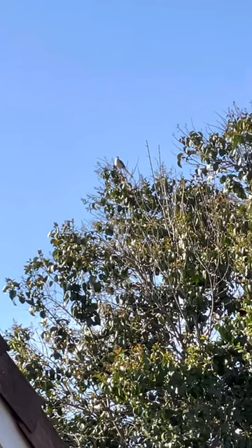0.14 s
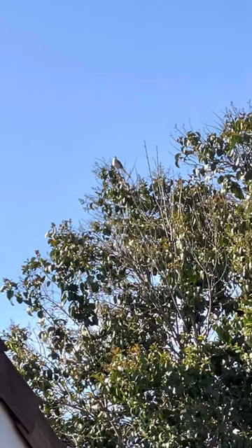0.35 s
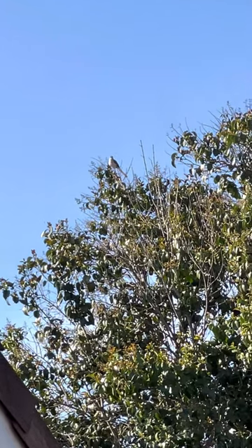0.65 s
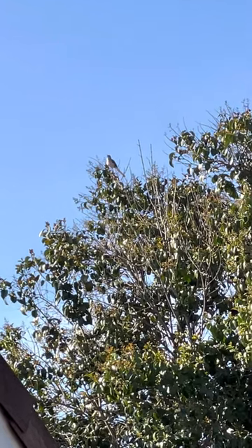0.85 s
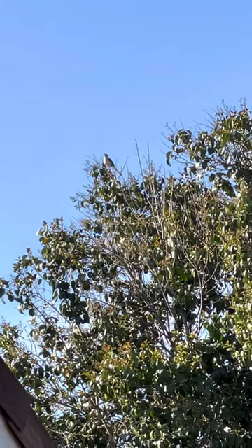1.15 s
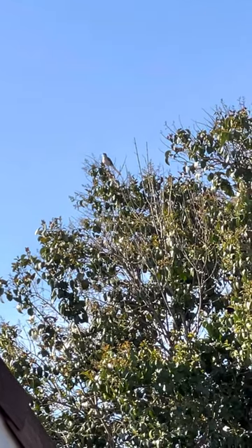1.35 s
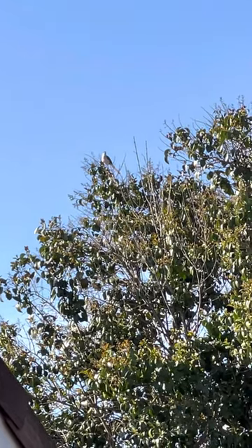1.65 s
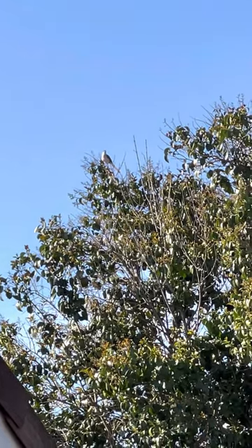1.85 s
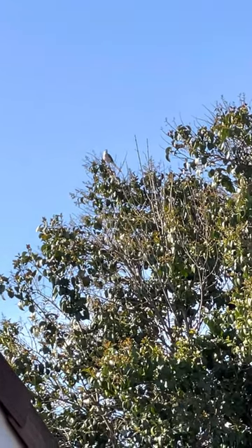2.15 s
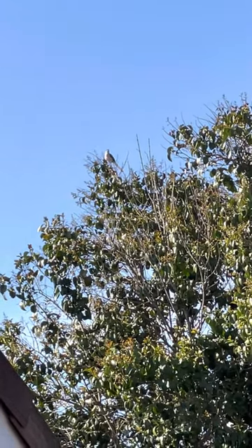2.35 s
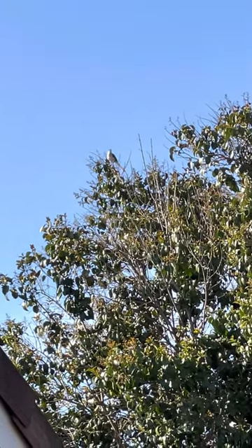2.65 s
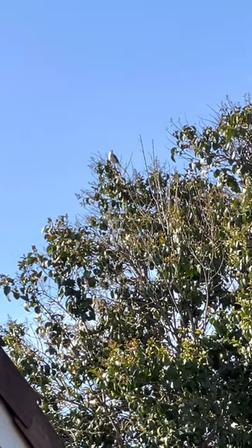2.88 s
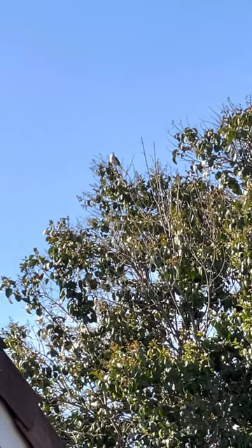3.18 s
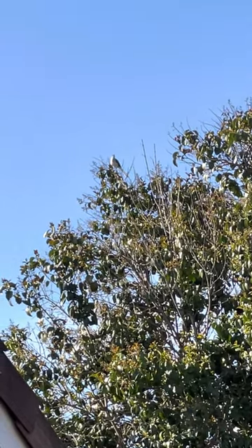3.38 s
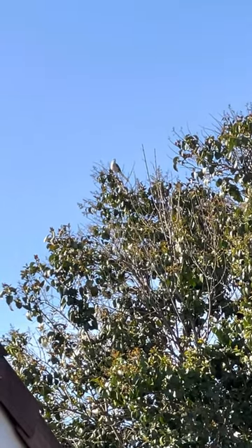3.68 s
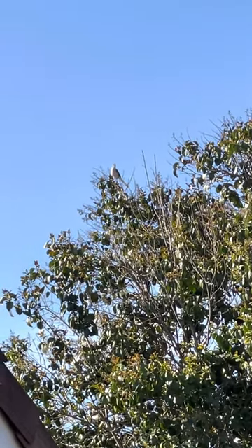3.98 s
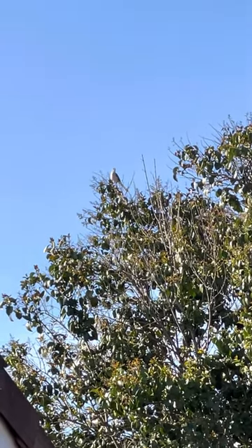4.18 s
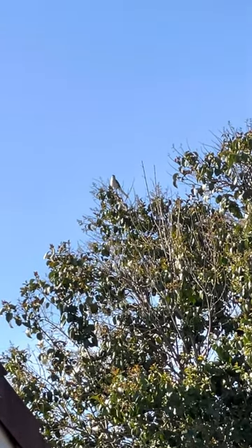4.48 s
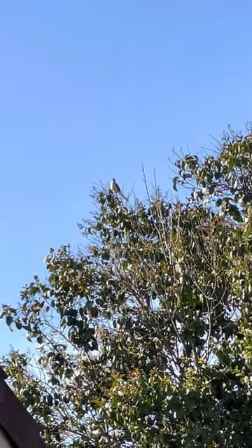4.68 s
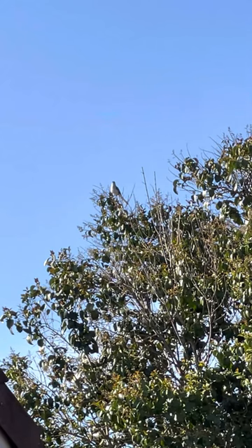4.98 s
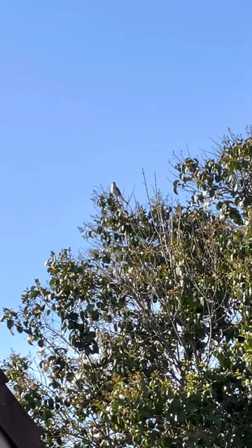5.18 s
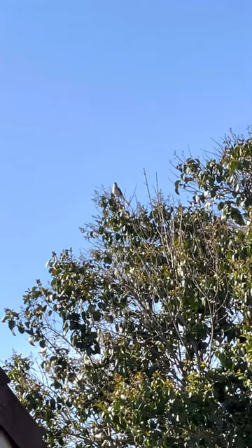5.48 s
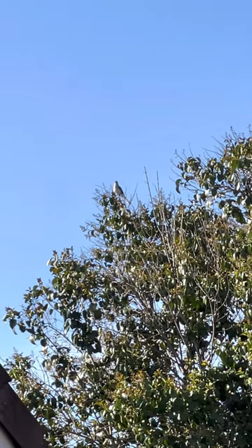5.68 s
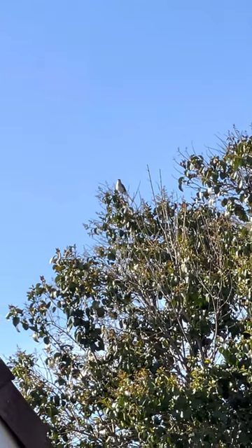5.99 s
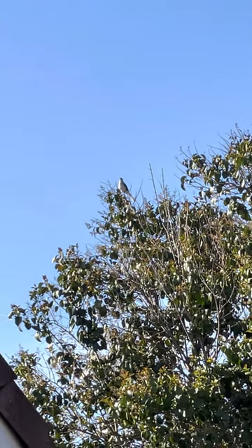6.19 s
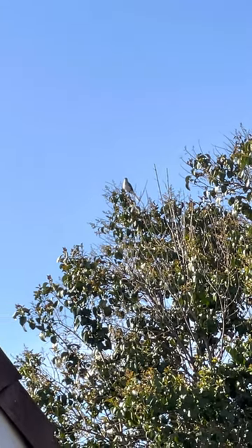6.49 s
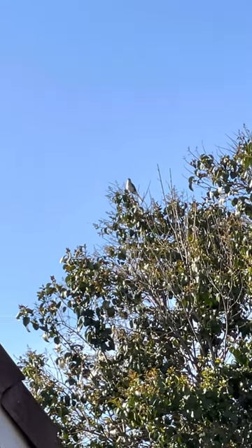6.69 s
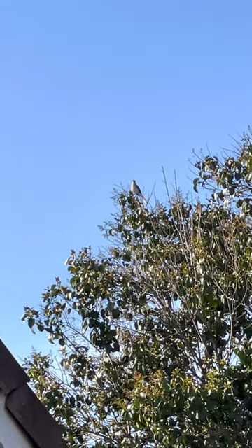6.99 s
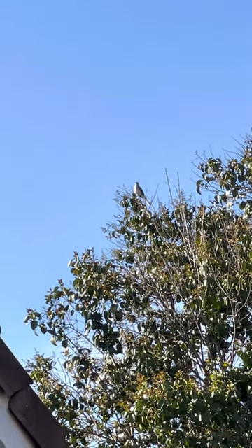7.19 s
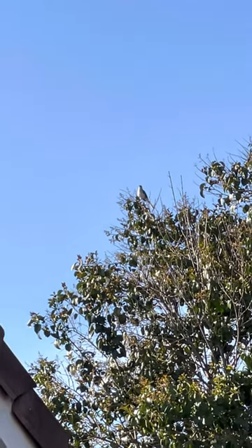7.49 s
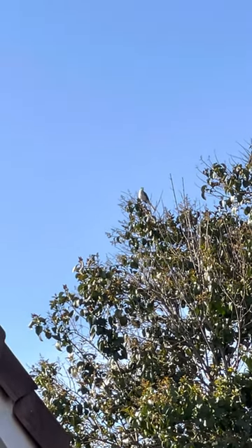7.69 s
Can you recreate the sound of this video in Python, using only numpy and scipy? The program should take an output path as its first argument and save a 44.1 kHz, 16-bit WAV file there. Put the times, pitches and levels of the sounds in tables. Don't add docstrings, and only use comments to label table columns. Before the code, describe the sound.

Outdoors, a bird whines once, mews five times like a cat, then rasps two sharp chips; faint wren trills, dove coos and town rumble behind.

```python
import sys
import numpy as np
from scipy import signal
from scipy.fft import rfft, irfft, next_fast_len
from scipy.io import wavfile
from scipy.ndimage import uniform_filter1d, map_coordinates

SR = 44100
rng = np.random.default_rng(int(sys.argv[2]) if len(sys.argv) > 2 else 0)


def int16_out(signal):
    q = np.round(np.clip(np.atleast_2d(signal).T, -1, 1) * 32767)
    wavfile.write(sys.argv[1], SR, q.astype(np.int16))


def attenuation_scalar(level_db):
    decades = np.asarray(level_db, float) / 20
    return 10 ** decades


N = 345744
T = np.arange(N) / SR
TOP_HZ = 15690


def unit(x):
    return x / np.sqrt(np.mean(x ** 2) + 1e-20)


def along(points, hz):
    f, v = np.transpose(points)
    return np.interp(np.log(hz + 1), np.log(f + 1), v)


def wobble(rate, size=N):
    knots = rng.standard_normal(int(size * rate / SR) + 4)
    return map_coordinates(knots, [np.arange(size) * rate / SR])


def wobbles(rate, size, count, group):
    curves = np.array([wobble(rate, size=size) for _ in range(0, count, group)])
    return curves.repeat(group, 0)[:count]


def filtered(x, response):
    m = next_fast_len(x.shape[-1] + 8192)
    return irfft(rfft(x, m) * response(np.fft.rfftfreq(m, 1 / SR)), m)[..., :x.shape[-1]]


def span(rows):
    s, *cols = np.transpose(rows)
    t = np.arange(s[0], s[-1], 1 / SR)
    edge = np.clip(np.minimum(t - s[0], s[-1] - t) / 0.004, 0, 1)
    return round(s[0] * SR), edge, [np.interp(t, s, c) for c in cols]


def add(track, start, x):
    track[start:start + len(x)] += x[:len(track) - start]


def voice(calls, throat, count, sharp, steep, leak_db, jitter, rasp, shimmer_db,
          flutter_hz, flutter_db, breath_db, closing_db):
    patchy_db, leak_hz = 4, 3000
    gape_hz = 170
    out, k = np.zeros(N), np.arange(2, count + 1)[:, None]
    for rows in calls:
        start, edge, (hz, beak_hz, db) = span(rows)
        n = len(hz)
        hz = uniform_filter1d(hz, size=1100, mode="nearest")
        glide = uniform_filter1d(np.abs(np.gradient(hz)) * SR, size=900) / 1000
        unsteady_hz = hz * (1 + (jitter + rasp * glide) * wobble(250, size=n))
        phase = 2 * np.pi * np.cumsum(unsteady_hz) / SR
        fall = np.maximum.accumulate(hz) - hz
        beat_hz = (flutter_hz + .7 * fall) * (1 + 0.12 * wobble(30, size=n))
        beat = 2 * np.pi * np.cumsum(beat_hz) / SR
        upper = attenuation_scalar(flutter_db) * np.clip(fall / 25 - 1, 0, 1)

        partial_hz = k * hz
        over = partial_hz / beak_hz
        gape = 1 + (hz.max() - hz - fall) / gape_hz
        ring = np.abs(sharp / gape * (1 - over ** 2) + 1j * over) ** -steep
        leak = attenuation_scalar(leak_db + patchy_db * wobbles(14, n, len(k), 3)) / (1 + (partial_hz / leak_hz) ** 3)

        ceiling_hz = 10300 + 1.95 * beak_hz
        dull_db = closing_db * np.clip(k - 5, 0, None) * fall / 50
        dull_db = dull_db + 14 * np.clip(partial_hz - ceiling_hz, 0, None) / 1000
        gain = attenuation_scalar(along(throat, partial_hz) - dull_db) * (ring + leak) * (partial_hz < TOP_HZ)
        gain = gain * np.sqrt(2 / (1 + upper ** 2)) * attenuation_scalar(shimmer_db * wobbles(70, n, len(k), 2))

        spread = k ** 1.7 * (1 + glide + (k - 2) * fall / 25)
        air = attenuation_scalar(breath_db) * spread * wobbles(400, n, len(k), 1)
        angle = k * phase
        lines = np.sin(angle + k * k) + upper * (np.sin(angle + beat) + 0.24 * np.sin(angle - beat))
        stack = (lines + air * np.cos(angle)) / np.sqrt(1 + attenuation_scalar(2 * breath_db) * spread ** 2)
        add(out, start, edge * attenuation_scalar(db) * np.sum(gain * stack, 0))
    return out


def whine(rows, sharp):
    # frequency in hertz, gain in dB.
    whine_throat = [(1500, -23), (2600, -6.5), (3500, -6.5), (5100, -3), (6100, -1), (7000, -10.5),
                    (8700, 12), (9600, -31), (11000, 10.5), (13500, 3), (15500, 2)]
    return voice([rows], whine_throat, count=20, sharp=sharp, steep=1.256, leak_db=-37, jitter=0.0054,
                 rasp=.007, shimmer_db=2.0, flutter_hz=0, flutter_db=-58, breath_db=-36.5, closing_db=9)


def near_whine():
    # time in seconds, pitch in hertz, beak resonance in hertz, level in dB.
    whine_path = [(.69, 689, 5200, -88), (.712, 717, 5260, -52), (.738, 799, 5900, -47),
                  (.785, 838, 5440, -46), (.865, 844.5, 5120, -44.5), (.93, 866, 4100, -43.5),
                  (1.1, 876, 4100, -48), (1.2, 894.4, 4000, -54), (1.24, 928, 3850, -76)]
    return whine(whine_path, sharp=4.38)


def melody(mew, db):
    # stage (0-1 climb, 1-2 arch, 2-3 fall), pitch as a share of top pitch,
    # beak resonance in hertz, level in dB.
    mew_shape = [(0, .75, 2460, -77.5), (.25, .79, 2470, -60.5), (.6, .878, 2860, -49),
                 (0.999, .963, 2720, -44.5), (1.5, 1.002, 2340, -43), (1.951, .978, 1850, -47),
                 (2.24, .968, 1480, -48), (2.62, .875, 1485, -52), (3, .83, 1364, -70.5)]
    s, *stages_s, top_hz = mew
    stage, share, beak_hz, level_db = np.transpose(mew_shape)
    times = np.interp(stage, np.arange(len(stages_s) + 1), np.cumsum([s] + stages_s))
    return np.transpose([times, top_hz * share, beak_hz, db + level_db])


def mews():
    # start in seconds, climb in seconds, arch until the beak shuts in seconds,
    # fall in seconds, top pitch in hertz.
    mew_calls = [
        (1.37, .098, .127, .255, 783),
        (2.06, .118, .102, .18, 776),
        (3.55, .094, .136, .24, 797),
        (4.37, .1, .107, .263, 785),
        (5.05, .128, .084, .198, 782),
    ]
    mew_strengths = [-0.2, 0.55, -0.91, 0.61, -0.24]
    # frequency in hertz, gain in dB.
    mew_throat = [(1500, -0.5), (2300, 1.5), (3000, -1.5), (3800, 5), (4500, -8.5), (5300, 2), (8700, 4),
                  (9700, -41.5), (11000, 20), (12400, 14.5), (14300, 29), (15500, 21.5)]
    return voice(map(melody, mew_calls, mew_strengths), mew_throat, count=22, sharp=4.75, steep=1.71,
                 leak_db=-26, jitter=0.0033, rasp=.0008, shimmer_db=1.5, flutter_hz=44.85, flutter_db=-2.0,
                 breath_db=-34, closing_db=.85)


def chips():
    # start in seconds, length in seconds, level in dB, beak closing at the middle (no unit).
    chip_calls = [
        (.694, 0.032, -56, -1.5),
        (6.594, 0.074, -44, 0.68),
        (7.603, 0.067, -42.5, 0.63),
    ]
    # frequency in hertz, noise density in dB per hertz.
    beak_open = [(710, -63), (1200, -36), (2030, -33), (2330, -8), (2770, -2), (3180, -16.5), (3660, -0.5),
                 (4160, -20.5), (5150, -12.5), (5680, -19), (7580, -22), (9700, -19.5), (10000, -33),
                 (11100, -21.5), (15500, -47)]
    beak_shut = [(710, -70), (1200, -27), (1640, -21.5), (2260, 3.5), (2890, -3.5), (4120, -32),
                 (4780, -30.5), (5680, -43.5), (8080, -35), (10100, -60), (15500, -37)]
    attack_s, release_s, edge_db = 0.012, 0.024, -22
    out = np.zeros(N)
    for s, length, top_db, shut in chip_calls:
        turns = s + np.array([0, attack_s, length - release_s, length])
        levels = top_db + edge_db * np.array([1, 0, 0, 1])
        start, edge, (db,) = span(np.transpose([turns, levels]))
        n = len(db)
        flap_hz = 230 * (1 + 0.304 * wobble(100, size=n))
        flaps = 1 + 0.16 * np.sin(2 * np.pi * np.cumsum(flap_hz) / SR)
        opened, closed = (unit(filtered(flaps * rng.standard_normal(n), lambda hz: attenuation_scalar(along(beak, hz))))
                          for beak in (beak_open, beak_shut))
        ramp = np.clip(np.linspace(-1, 1, n) * 2.1 + shut, 0, 1)
        add(out, start, edge * attenuation_scalar(db) * (np.sqrt(1 - ramp) * opened + np.sqrt(ramp) * closed))
    return out


def whistles(notes, buzz=0, buzz_hz=230, unsteady=0.0049):
    out = np.zeros(N)
    for s, length, a, b, c, db in notes:
        u = np.linspace(-1, 1, round(length * SR))
        bend_hz = b + (c - a) / 2 * u + ((a + c) / 2 - b) * u * u
        hz = bend_hz * (1 + unsteady * wobble(60, size=len(u)))
        swell = np.sqrt(1 - u ** 4) * (1 + buzz * np.sin(np.pi * buzz_hz * length * u))
        level = attenuation_scalar(db + 5 + wobble(22, size=len(u)))
        add(out, round(s * SR), level * swell * np.sin(2 * np.pi * np.cumsum(hz) / SR))
    return out


def arched(notes, arch):
    return [(s, length, a, (a + b) / 2 * (1 + arch), b, db) for s, length, a, b, db in notes]


def chip_peep():
    # start in seconds, length in seconds, start and end pitch in hertz, level in dB.
    thin_tone = [(7.59, 0.059, 4960, 5380, -65.5)]
    return whistles(arched(thin_tone, 0))


def earlier_whine():
    # time in seconds, pitch in hertz, beak resonance in hertz, level in dB.
    whine_end = [(0, 920, 5070, -59.5), (.025, 868, 5040, -76)]
    return whine(whine_end, sharp=1.75)


def wren():
    # start in seconds, trill beats, trill level in dB, buzz start in seconds, buzz level in dB.
    wren_songs = [
        (1.704, 9, -69.5, 2.56, -65.5),
        (5.63, 9, -70.5, 6.5, -64.5),
    ]
    slurs, buzzes = [], []
    for s, beats, db, buzz_s, buzz_db in wren_songs:
        slurs.append((s, .09, 5600, 5650, 5600, db - 11.5))
        for beat in s + .093 + .0877 * np.arange(round(beats)):
            slurs.append((beat, .024, 3750, 3250, 2650, db - 2.0 + 5 * (beat - s)))
            slurs.append((beat - .045, .035, 3500, 3750, 3300, db - 9))
            if beat < s + .75:
                slurs.append((beat + .052, .026, 6100, 5800, 5500, db - 2.0))
                slurs.append((beat + .005, .045, 5550, 5750, 6000, db - 9.0))
        buzzes.append((buzz_s - .06, .08, 4470, 4510, 4560, buzz_db - 16.5))
        buzzes.append((buzz_s, .16, 4560, 4600, 4640, buzz_db))
        slurs.append((buzz_s + 0.13, .14, 4640, 4680, 4660, buzz_db - 10))
        slurs.append((buzz_s + 0.21, .26, 4660, 4650, 4620, buzz_db - 28.5))
    return whistles(slurs, unsteady=.008) + whistles(buzzes, buzz=0.52, unsteady=.012)


def small_birds():
    # start in seconds, length in seconds, start and end pitch in hertz, level in dB.
    hooks = [(2.375, 0.039, 2796, 2500, -62.5), (2.565, .031, 3020, 2250, -66.5)]
    chirps = [(2.82, 0.02, 4750, 2530, -67), (3.48, .029, 3230, 4220, -82),
              (3.85, 0.035, 3410, 3580, -76.5)]
    peeps = [(2.54, .022, 1970, 1880, -71.5), (2.72, .04, 3520, 3870, -71),
             (3.01, 0.041, 3040, 2914, -81.5), (3.12, 0.046, 3060, 3660, -74),
             (3.17, .044, 3970, 3280, -77), (3.52, 0.055, 3440, 3460, -77), (3.91, 0.022, 2200, 1970, -79),
             (4.0, 0.029, 4070, 3750, -73), (4.03, 0.028, 3440, 3370, -83), (4.06, 0.029, 4060, 3740, -87),
             (4.2, 0.027, 3700, 3000, -79.5), (5.61, .024, 3180, 3170, -83.5),
             (7.2, 0.034, 2560, 2170, -90), (3.27, 0.35, 1223, 1195, -80), (7.36, 0.068, 1217, 1203, -80)]
    seeps = [(2.97, .11, 6400, 7600, -100), (3.12, 0.038, 6900, 6800, -85), (3.22, .09, 6500, 7150, -90.5),
             (3.33, .04, 6700, 6680, -93), (3.5, 0.052, 6100, 7300, -100), (4.15, .1, 7000, 7440, -94.5),
             (6.015, .017, 5840, 7300, -82.5), (6.03, 0.029, 7300, 7310, -78),
             (2.6, 0.25, 1480, 1760, -78.5), (2.9, 0.38, 1550, 1505, -82.5)]
    notes = arched(hooks, .57) + arched(chirps, 0.11) + arched(peeps, .012) + arched(seeps, 0.061)
    return attenuation_scalar(-3) * whistles(notes, buzz=0.44, buzz_hz=152.7, unsteady=.02)


def dove():
    # start in seconds, length in seconds, start and end pitch in hertz, level in dB.
    coos = [
        (6.58, 0.17, 468, 499, -63.5),
        (6.86, 0.53, 513, 460, -59),
        (7.58, 0.17, 452, 483, -62),
    ]
    return whistles(arched(coos, 0.046), unsteady=0.022) * [[1.3], [-.65]]


def yard(x, wall_s, wall_db):
    # frequency in hertz, time to decay by 60 dB in seconds.
    decay_times = [(500, 0.44), (1500, 0.47), (2500, 0.59), (4600, 0.36), (7000, 0.23), (12000, 0.046)]
    out = np.zeros(N + 2 * SR)
    for start in range(0, N, SR // 2):
        hz, t, z = signal.stft(rng.standard_normal(SR * 3 // 4), SR, nperseg=256)
        decay = attenuation_scalar(-60 * t / along(decay_times, hz)[:, None])
        wall = 1 + attenuation_scalar(wall_db) * np.exp(-((t - wall_s) / 0.011) ** 2)
        tail = signal.istft(z * decay * wall, SR, nperseg=256)[1]
        tail = tail / np.linalg.norm(tail)
        add(out, start + 300, signal.fftconvolve(x[start:start + SR // 2], tail))
    return out[:N]


def ports(x):
    lead = [(0, 0), (1640, .4), (2500, .55), (3960, .55), (4800, .9), (5100, -.6), (6500, 1.1), (7240, 1.6),
            (8000, 2.2), (9000, 2.75), (9800, 3.14), (11900, 4), (13400, 5.2), (15200, 6)]
    # frequency in hertz, left minus right level in dB.
    lean = [(60, 2.5), (110, 3), (200, -12), (380, 6), (700, -7.5), (1290, 2.5), (2380, 0), (4400, 0.0),
            (8120, 2), (15000, 1)]

    def half(hz):
        return attenuation_scalar(along(lean, hz) / 2) * np.exp(.5j * along(lead, hz))

    return filtered(x, lambda hz: np.array([half(hz), 1 / half(hz)]))


def knocks():
    # start in seconds, peak level in dB.
    taps = [
        (.28, -68),
        (5.508, -44.5),
    ]
    out, t = np.zeros(N), T[:SR // 20]
    for s, db in taps:
        add(out, round(s * SR), attenuation_scalar(db - 60 * t / 0.028) * rng.standard_normal(len(t)))
    return filtered(out, lambda hz: 4 / (1 + (hz / 500) ** 2)) * [[1.3], [-.6]]


def town():
    # time in seconds, traffic strength in dB.
    traffic = [(0.0, -49.5), (0.37, -51.5), (0.59, -51), (2.05, -54.5), (4.0, -55.5), (4.65, -53.5),
               (5.17, -53), (5.74, -54), (6.07, -54.5), (7.84, -53.5)]
    # frequency in hertz, density in dB per hertz.
    rumble_spectrum = [(12, -42), (20, -12.5), (59, -1), (81, 1.5), (124, -5), (184, -15.5), (237, -12.5),
                       (420, -37), (550, -54), (920, -120)]
    rush_spectrum = [(180, -31.5), (300, 0), (439, -6), (517, -8.5), (808, -7.5), (892, -11.5), (1730, -21),
                     (2650, -25.5), (3690, -30.5), (4890, -37), (6270, -37.5), (9470, -49.5),
                     (15500, -54.5)]
    # frequency in hertz, side minus mid level in dB.
    width_spectrum = [(60, -46), (110, -37.5), (200, -15.5), (380, -6), (700, -0.5), (1290, -1.5),
                      (2380, -14.5), (4400, -12), (8120, 5.5), (15000, 4)]
    rumble_db = np.interp(T, *np.transpose(traffic))
    rush_db = -68.5 + 0.6 * (rumble_db - rumble_db.mean()) + .9 * wobble(2.913)

    def wide(hz):
        return attenuation_scalar([0 * hz, along(width_spectrum, hz)])

    z = signal.stft(rng.standard_normal((2, N)), nperseg=512)[2]
    field = rng.standard_normal(z.shape[1:])
    field = uniform_filter1d(uniform_filter1d(field, 6, 0), 14, 1)
    patchy = signal.istft(z * attenuation_scalar(1.7 * unit(field)), nperseg=512)[1][:, :N]
    rush = filtered(patchy, lambda hz: attenuation_scalar(along(rush_spectrum, hz)) * wide(hz))
    rumble = filtered(rng.standard_normal((2, N)), lambda hz: attenuation_scalar(along(rumble_spectrum, hz)) * wide(hz))
    rush = rush / np.std(rush[0]) * attenuation_scalar(rush_db)
    rumble = rumble / np.std(rumble[0]) * attenuation_scalar(rumble_db + 1.5 + 0.55 * wobble(8.6))
    mid, side = rush + rumble
    return np.array([mid + side, mid - side])


def scene():
    near = near_whine() + mews() + chips() + chip_peep()
    song, far, earlier = wren(), small_birds(), earlier_whine()
    distant = yard(attenuation_scalar(1.5) * song + attenuation_scalar(4) * far + earlier, wall_s=0.06, wall_db=-9)
    trees = near + attenuation_scalar(-18) * yard(near, wall_s=.09, wall_db=-9.5)
    trees = trees + attenuation_scalar(.6) * song + far + attenuation_scalar(2.5) * earlier + attenuation_scalar(-5.0) * distant
    return ports(trees) + dove() + knocks() + town()


def band_limit(x):
    return signal.sosfilt(signal.butter(12, 15690, fs=SR, output="sos"), x)


def record(dry):
    # frequency in hertz, gain in dB.
    microphone = [(24, -18), (33, 0), (9200, 0), (9600, -13.5), (10200, -6.5), (10800, 1.5), (15550, 1.5),
                  (15800, -39.5)]
    mix = filtered(dry, lambda hz: attenuation_scalar(along(microphone, hz)))
    return band_limit(mix)


dry = scene()
out = record(dry)
int16_out(out)
```